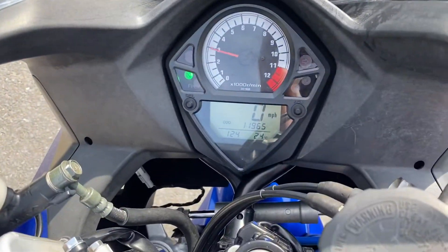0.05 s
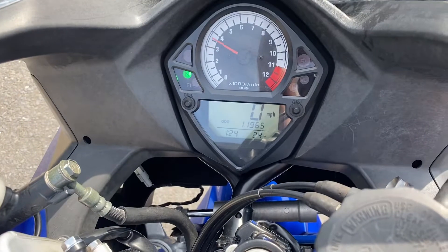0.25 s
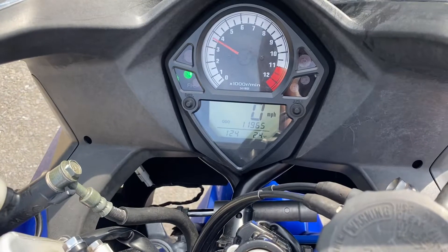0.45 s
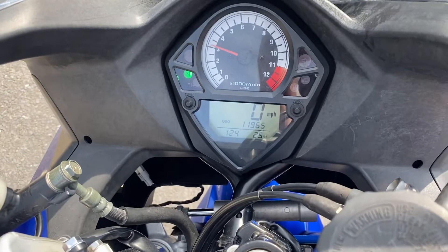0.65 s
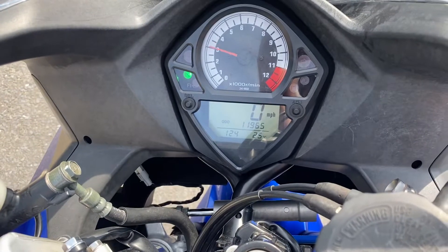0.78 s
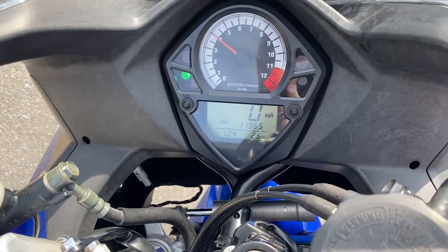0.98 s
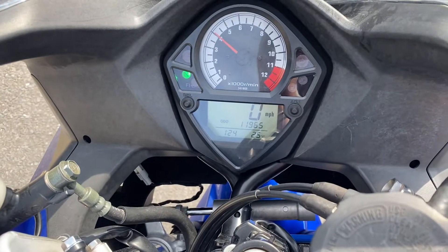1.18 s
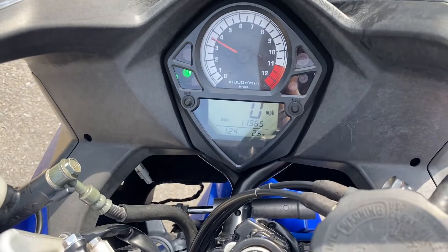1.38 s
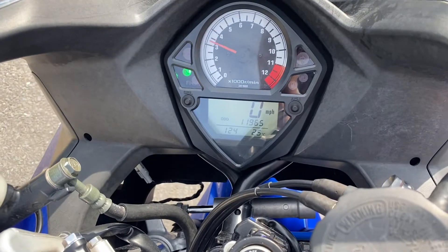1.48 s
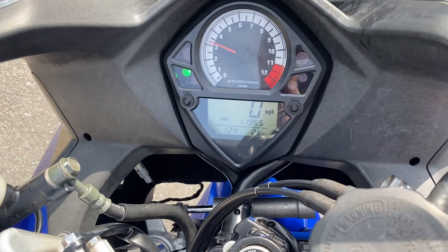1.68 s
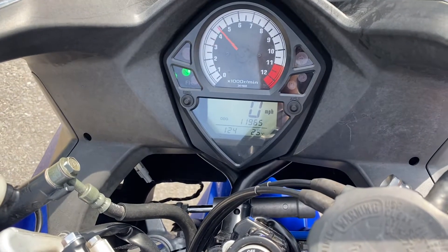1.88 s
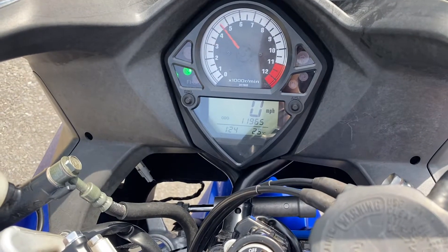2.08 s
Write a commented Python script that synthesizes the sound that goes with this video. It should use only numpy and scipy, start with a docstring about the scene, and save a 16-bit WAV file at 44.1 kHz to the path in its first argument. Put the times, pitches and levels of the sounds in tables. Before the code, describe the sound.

A stationary twin-cylinder motorcycle revs from close by outdoors: a brief rise and sag, then two throttle blips, each with a gulping intake roar, climbing gear whine and bassy exhaust, heard from the rider's seat.

```python
"""A V-twin motorcycle outdoors, heard from the saddle: its revs first rise briefly, then sag.
At about 0.6 s and 1.4 s the throttle snaps open; each time the revs climb, then sag again.
Throughout, filtered noise makes the rush of air and machinery, and noise bursts ringing in the airbox
make the intake gulps. Short sine tones puff once a turn, strongest around the two blips.
Sine waves locked to the crank make the whine of the gears and the booming exhaust."""
import sys
import numpy as np
from scipy import signal
from scipy.fft import rfft, irfft
from scipy.io import wavfile
from scipy.ndimage import uniform_filter1d

SR = 44100
rng = np.random.default_rng(int(sys.argv[2]) if len(sys.argv) > 2 else 0)


def boost(x):
    """Linear amplitude factor 10**(x/20) for a level x in decibels (scalar or array-like)."""
    u = np.asarray(x, float) / 20
    return 10 ** u


def dump_mix(stems):
    """Bounce the given channels to the path in sys.argv[1] as a 16-bit WAV at rate SR."""
    frames = np.atleast_2d(stems).T  # one column per channel
    limited = np.clip(frames, -1, 1)  # hard clip at full scale
    pcm = np.round(limited * 32767).astype(np.int16)
    wavfile.write(sys.argv[1], SR, pcm)


N = 94506  # length in samples
T = np.arange(N) / SR  # time in seconds


def curve(points, col=1):
    """Reads one column of a table over time, with straight lines between the rows."""
    rows = np.array(points)
    return np.interp(T, rows[:, 0], rows[:, col])


def read(points, hz):
    """Reads a table of values against frequency, on a log frequency axis."""
    f, value = np.transpose(points)
    return np.interp(np.log(hz + 1), np.log(f + 1), value)


def wander(hz):
    """Random drift of rms 1: sixteen sines of chance phase, from an eighth of hz up to hz."""
    f = np.geomspace(hz / 8, hz, num=16)[:, None]
    coarse = T[::64]
    sines = np.sin(2 * np.pi * (f * coarse + rng.random(f.shape)))
    return np.interp(T, coarse, sines.sum(0) / np.sqrt(16 / 2))


# How the rush swells and fades; only the changes count, since each band's average is taken out.
# Each row: start in seconds, low band in dB, middle band in dB, treble band in dB.
RUSH_LEVELS = [(0.0, -25, -23.5, -37.5), (0.13, -28, -30, -40.5), (0.5, -36, -35.5, -47.5),
               (0.57, -24, -29, -44.5), (0.58, -32, -27.5, -43), (0.61, -23.5, -21.5, -40.5),
               (0.64, -24, -29, -37.5), (0.69, -23, -23, -36), (1.12, -32, -31, -44),
               (1.39, -33, -33, -44.5), (1.43, -25, -21.5, -42.5), (1.45, -32, -28, -42.5),
               (1.57, -26.5, -22.5, -37.5), (1.68, -20, -22, -33), (1.69, -23, -27, -34.5),
               (1.74, -24.5, -24.5, -37), (2.03, -31.5, -32, -43), (2.14, -33, -30.5, -43.5)]
# The centres of those three bands, in one row: low in Hz, middle in Hz, treble in Hz.
RUSH_CENTRES = (400, 1700, 6000)
# The tone colour of the rush. Each row: frequency in Hz, relative level in dB per Hz.
RUSH_TONE = [(150, -12), (290, -16.5), (600, -18.5), (1200, -22.5), (1700, -20), (2860, -32), (3500, -31),
             (5200, -34.5), (7000, -40), (8500, -43.5), (10500, -48), (12000, -56), (14400, -50.5),
             (16050, -42), (16250, -90)]
# How alike left and right are. Each row: frequency in Hz, likeness from -1 (opposite) to 1 (same).
STEREO_LIKENESS = [(60, -0.72), (200, 0.98), (600, 0.61), (1400, 0.64), (1720, -0.37), (2300, 0.52),
                   (4000, 0.44), (6500, 0.62), (8500, .95), (16000, 1)]
# How far the rush leans left. Each row: frequency in Hz, left minus right in dB.
STEREO_LEAN = [(60, -17), (110, -1), (200, -4.5), (380, 3), (700, 1), (1290, 6.5), (2380, 1.5), (4400, 5.0),
               (8120, 4.5), (15000, -5)]


def rush(turns):
    """Intake roar and mechanical hiss: noise in small patches of time and pitch, throbbing with the crank."""
    rush_db, rush_from_hz = -22, 140  # overall rms, low end of the rush
    patch_db, flicker_db = 1, 2
    throb_db, throb_at = -0.5, 0.23  # negative: quietest at this part of a turn
    port_hz, port_lag_s = 6800, .00029  # above port_hz the two microphone ports drift apart in phase

    frames = N // 64 + 5
    hz = np.fft.rfftfreq(256, 1 / SR)
    a, b, c, d, patches = rng.standard_normal((frames, 129, 5)).T
    patches = uniform_filter1d(patches, size=4, axis=0)
    patches = uniform_filter1d(patches, size=12, axis=1)
    flicker = uniform_filter1d(rng.standard_normal(frames), size=3)

    # The three band levels blend smoothly into one another across frequency.
    at = np.minimum(np.arange(frames) * 64, N - 1)
    bands = np.array([curve(RUSH_LEVELS, col)[at] for col in range(1, 4)])
    bands -= bands.mean(1, keepdims=True)
    place = np.interp(np.log(hz + 1), np.log(RUSH_CENTRES), range(3))
    share = np.clip(1 - abs(place[:, None] - np.arange(3)), 0, 1)
    db = share @ bands + patch_db * patches / patches.std() + flicker_db * flicker
    db += throb_db * np.cos(2 * np.pi * (turns[at] - throb_at))

    noise = boost(db) * np.array([a + 1j * b, c + 1j * d])
    one, other = rfft(signal.istft(noise, nperseg=256, noverlap=192)[1][:, :N])

    # Mix two independent noises into a left and a right that are partly alike.
    hz = np.fft.rfftfreq(N, 1 / SR)
    same = np.clip(read(STEREO_LIKENESS, hz), -1, 1)
    # Half of the lean and of the lag goes to each side.
    lag = np.exp(-1j * np.pi * port_lag_s * np.maximum(hz - port_hz, 0))
    lean = boost(read(STEREO_LEAN, hz) / 2) * lag
    left = one * lean
    right = (same * one + np.sqrt(1 - same ** 2) * other) / lean
    low_cut = np.sqrt(1 + (rush_from_hz / (hz + 1)) ** 8)
    out = irfft(np.array([left, right]) * boost(read(RUSH_TONE, hz)) / low_cut, N)
    return boost(rush_db) * out / out.std()


def resonate(x, hz, width):
    """A two-pole resonance that passes its own frequency at gain 1."""
    return signal.lfilter(*signal.iirpeak(hz, hz / width, fs=SR), x)


# The air in the airbox rings at these pitches.
# Each row: frequency in Hz, width in Hz, relative level in dB.
AIRBOX_RINGS = [(324, 240, -7), (510, 60, 4.5), (655, 23, 0), (796, 60, 5.5), (1230, 900, -26),
                (1840, 620, -22.5)]
# The throttle snaps open. Each row: start in seconds, extra loudness in dB, which then dies away.
THROTTLE_SNAPS = [(.548, 16), (0.599, 17), (1.42, 4)]


def intake(turns, throttle):
    """Each cylinder gulps a burst of turbulent air through the airbox, unevenly spaced as the V fires."""
    gulp_at, gulp_gap, gulp_turns = .2, .75, 0.35  # first gulp, wait for the second, decay; in crank turns
    level_db, throttle_db = -21.5, 22  # throttle_db: rise from shut to open
    snap_s = 0.028  # time for the extra dB to fall to about a third

    # The pair of gulps repeats every two turns.
    gate = sum(np.exp(-((turns - gulp_at - lag) % 2) / gulp_turns) for lag in (0, gulp_gap))
    snap_db = sum(db * (T > s) * np.exp(-abs(T - s) / snap_s) for s, db in THROTTLE_SNAPS)
    middle, side = rng.standard_normal((2, N))
    air = (middle + .5 * side * np.array([[1], [-1]])) * (gate + 0.25)
    box = sum(boost(db) * resonate(air, hz, width) / np.sqrt(width) for hz, width, db in AIRBOX_RINGS)
    return box / box.std() * boost(level_db - throttle_db * (1.5 - throttle) + snap_db)


# The tones in one puff. Each row: frequency in Hz, relative level in dB.
WHISTLE_TONES = [(793, 0), (638.4, -8.5), (885, -15.5)]
# How loud the puffs are. Each row: start in seconds, relative level in dB.
PUFF_LEVELS = [(0.0, -29), (0.06, -25), (0.09, -32.5), (0.33, -60), (0.41, -55), (0.44, -62), (0.57, -45),
               (0.61, -28), (0.63, -24), (0.69, -13.5), (0.71, -20), (0.78, -20.5), (0.8, -22), (0.85, -17),
               (1.03, -36), (1.25, -46), (1.29, -33), (1.3, -49), (1.33, -26), (1.41, -36), (1.42, -34),
               (1.56, -14.5), (1.57, -24), (1.66, -21), (1.72, -13.5), (1.74, -39), (1.76, -18.5),
               (1.85, -19), (2.06, -41), (2.14, -34.5)]


def puffs(turns):
    """A brief whistle near 800 Hz, switched on once each crank turn and cut off sharply."""
    puff_at, puff_s, edge_s = .70, .0115, .001  # part of a turn, length, fade-in (fade-out takes half)
    puff_spread_db, tone_spread_db = 1., 2.04  # chance in the whole puff and in each tone
    pitch_spread, phase_spread = 0.0068, 0.23  # part of the pitch, part of a tone's own period

    starts = np.flatnonzero(np.diff(np.floor(turns - puff_at)) > 0)
    chance = rng.standard_normal((120, 8))
    t = np.arange(0, puff_s, 1 / SR)
    out = np.zeros(N + 2000)
    gate = np.clip(np.minimum(t, (puff_s - t) * 2) / edge_s, 0, 1)
    level = boost(curve(PUFF_LEVELS) + 6.5)
    for at, c in zip(starts, chance):
        whistle = 0
        for k, (hz, db) in enumerate(WHISTLE_TONES):
            cycles = hz * (1 + pitch_spread * c[1]) * t
            # Each tone starts at a chance point of its period.
            phase = 2 * np.pi * (cycles + c[7] + phase_spread * c[k + 4])
            whistle = whistle + boost(db + tone_spread_db * c[k + 2]) * np.sin(phase)
        out[at:at + len(t)] += level[at] * boost(puff_spread_db * c[0]) * gate * whistle
    return out[:N]


# The whine of meshing gear teeth and its overtones. Each row: overtone number,
# level in dB with the throttle shut, level in dB with it open, left minus right in dB.
GEAR_TONES = [(1, -24, -22, 4), (2, -31, -40, 4), (3, -37, -47, 4), (4, -40, -49, 4), (5, -48, -54, 3)]
# How strongly the casing answers the gears. Each row: frequency in Hz, gain in dB.
CASING_GAIN = [(900, -10), (1150, -18), (1380, -9), (1520, 0), (1690, 0), (1850, -5), (2200, -2),
               (2500, -3), (2800, -8), (3400, -1), (4000, -8), (7000, -22)]


def gears(speed, turns, throttle):
    """Tooth-mesh whine and its overtones, loudest where the casing resonates."""
    teeth = 41  # tooth meshes per crank turn
    throb, flicker_db = .3, 2.5  # throb: part of the level, once a turn

    out = 0
    for k, shut_db, open_db, lean_db in GEAR_TONES:
        db = shut_db + (open_db - shut_db) * throttle
        db = db + read(CASING_GAIN, k * teeth * speed) + flicker_db * wander(40)
        level = boost(db) * (1 + throb * np.cos(2 * np.pi * (turns + rng.random())))
        # Phase in periods: the right side is shifted by chance, and both sides jitter together.
        shift = np.array([[0], [.3 * rng.random()]]) + .07 * wander(60)
        sides = boost(lean_db * np.array([[.5], [-.5]]))
        out = out + sides * level * np.cos(2 * np.pi * (k * teeth * turns + shift))
    return out


# The engine's tones ("orders"). Each row: cycles per two crank turns, level in dB with the throttle shut,
# level in dB with it open, head start in the tone's own periods.
ENGINE_ORDERS = [(3, -13, -12, .5), (4, 2, 0.5, 0.29), (5, -13, -9, 0.92), (6, -2.5, -2.5, 0.73),
                 (7, -4, -20.5, 0.69), (8, -8.5, -20.5, 0.12), (9, -16, -0.5, 0.34), (10, -6.5, -6, 0.41),
                 (11, -28.5, -9, 0.58), (12, -10, -10, 0.34), (13, -19, -4, 0.6), (14, -22.5, -11, 0.47),
                 (16, -11, -14, 0.54), (18, -11, -12, 0.37), (20, -16.5, 4, 0.48)]
# Exhaust and microphone response. Each row: frequency in Hz, gain in dB.
PIPE_GAIN = [(30, -55), (42, -26.5), (55, -25.5), (66, -13), (78, -7), (88, -14), (98, -9.5), (115, -17),
             (140, -15.5), (200, -33.5), (340, -30.5)]
# Strong and weak firings. Each row: start in seconds, exhaust level in dB.
FIRING_LEVELS = [(0, -1.5), (.08, 1.5), (.2, -1), (.25, -2.5), (.29, -3.5), (.3, 2), (.37, -0.5),
                 (.39, -5.5), (.47, -4.5), (.56, -2.5), (.65, 1.5), (.8, -0.5), (1, 0), (1.07, -5.5),
                 (1.09, 0), (1.18, 2), (1.2, -7), (1.27, -1.5), (1.28, 0.5), (1.36, 3), (1.375, -7),
                 (1.43, -4.5), (1.45, -1.5), (1.6, 1.5), (1.8, -1), (2, -1), (2.07, -3.5), (2.1, 1),
                 (2.14, 2)]


def exhaust(speed, turns, throttle):
    """Engine orders that drift a little in level and phase, coloured and delayed by the pipe."""
    pipe_delay_s, pipe_hz, pipe_width_hz = .012, 77, 8  # delay, resonance and its half-width
    lump_db, lump_periods, lump_hz = 1., .012, 5  # drift in level, in phase, and its fastest rate

    late = (turns - pipe_delay_s * speed) / 2  # delayed crank, in two-turn cycles
    out = 0
    for k, shut_db, open_db, lead in ENGINE_ORDERS:
        hz = k * speed / 2
        db = shut_db + (open_db - shut_db) * throttle
        db = db + read(PIPE_GAIN, hz) + lump_db * wander(lump_hz)
        phase = 2 * np.pi * (k * late + lead + lump_periods * wander(lump_hz))
        # The resonance turns the phase as a tone passes through it.
        phase = phase - np.arctan((hz - pipe_hz) / pipe_width_hz)
        out = out + boost(db) * np.cos(phase)
    return out * boost(curve(FIRING_LEVELS))


# How fast the engine spins. Each row: start in seconds, crank turns per second.
CRANK_SPEED = [(0.0, 32.59), (0.08, 34.39), (0.2, 28.63), (0.3, 24.13), (0.42, 20.36), (0.53, 18.65),
               (0.6, 23.27), (0.7, 33.6), (0.8, 37.83), (0.9, 33.95), (1.0, 29.34), (1.15, 23.89),
               (1.29, 20.54), (1.4, 20.57), (1.5, 27.3), (1.6, 36.14), (1.69, 41.23), (1.8, 37.94),
               (1.95, 31.19), (2.14, 24.0)]
# How far the throttle is open. Each row: start in seconds, opening from 0 (shut) to 1 (open).
THROTTLE_OPENING = [(0, 1), (.06, 0.35), (.14, 0.03), (.53, 0.01), (.6, 0.91), (.76, 1), (.84, 0.04),
                    (1.39, 0), (1.43, 1), (1.7, 0.8), (1.78, 0.16), (2.14, 0.06)]


def scene():
    """Runs every part off one crank and one throttle, and places it left or right."""
    speed = curve(CRANK_SPEED)
    throttle = np.clip(curve(THROTTLE_OPENING), 0, 1)
    turns = np.cumsum(speed) / SR
    slightly_right = boost(np.array([[-.2], [.2]]))
    left = boost(np.array([[1.2], [-1.2]]))
    mix = rush(turns) + intake(turns, throttle) * left + puffs(turns) * left
    return mix + gears(speed, turns, throttle) + exhaust(speed, turns, throttle) * slightly_right


def top_cut(x):
    """Nothing passes above the cut-off."""
    return signal.sosfilt(signal.butter(12, 16110, fs=SR, output="sos"), x)


def record(dry):
    """A phone input that rounds off the highest peaks."""
    rounded = 1.539 * np.tanh(dry / 1.464)
    return top_cut(rounded)


dry = scene()
out = record(dry)
dump_mix(out)
```